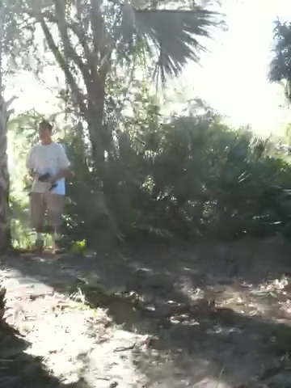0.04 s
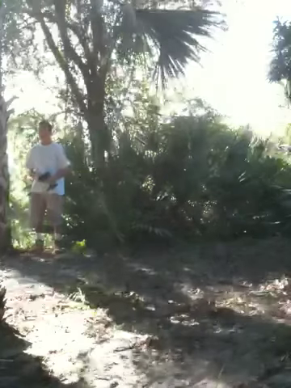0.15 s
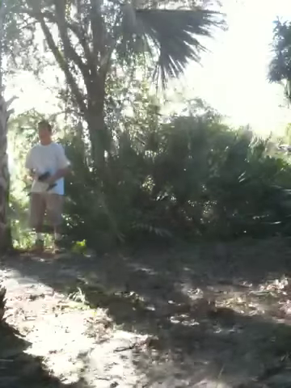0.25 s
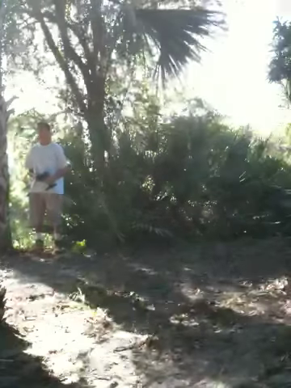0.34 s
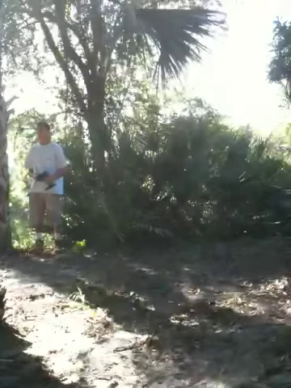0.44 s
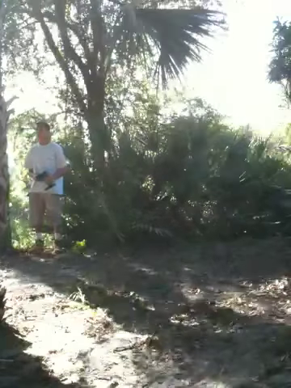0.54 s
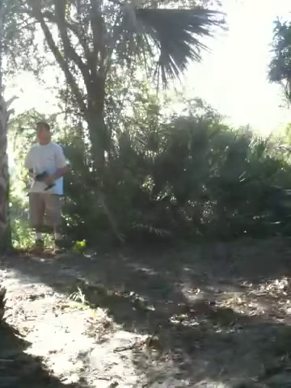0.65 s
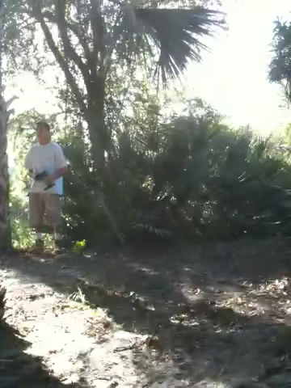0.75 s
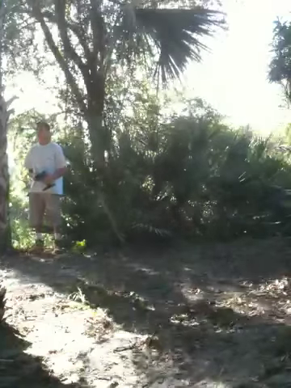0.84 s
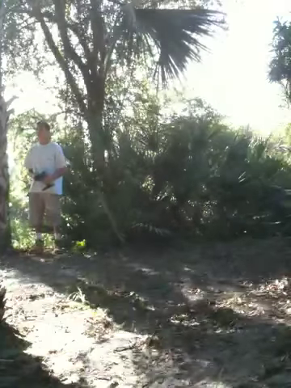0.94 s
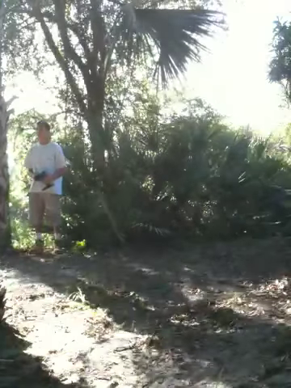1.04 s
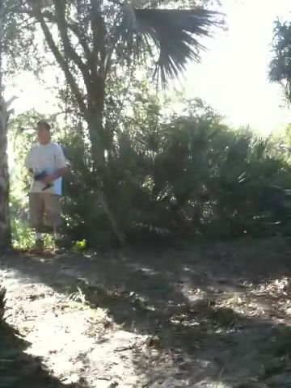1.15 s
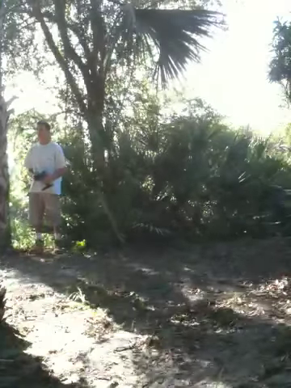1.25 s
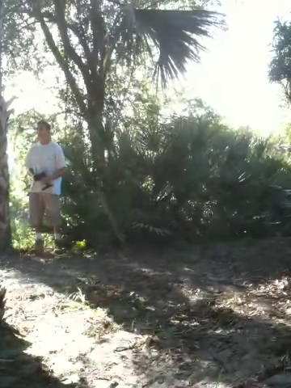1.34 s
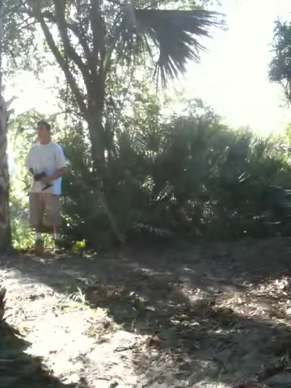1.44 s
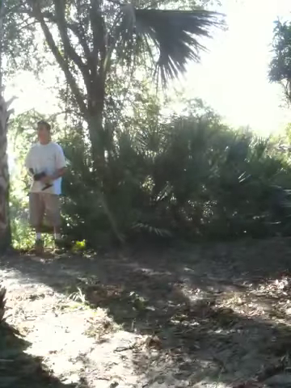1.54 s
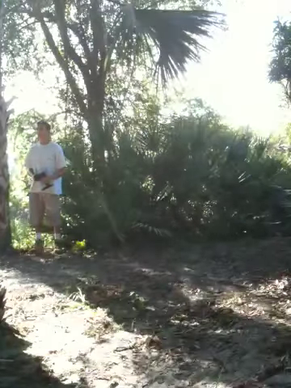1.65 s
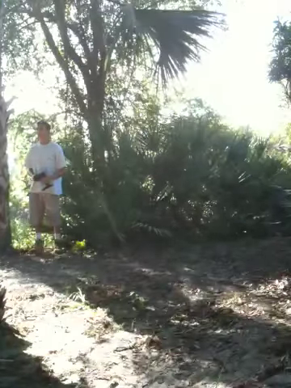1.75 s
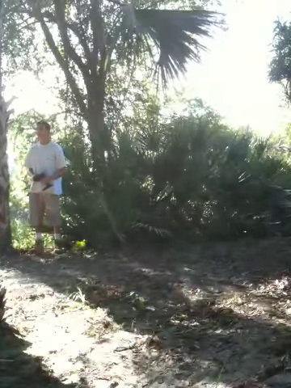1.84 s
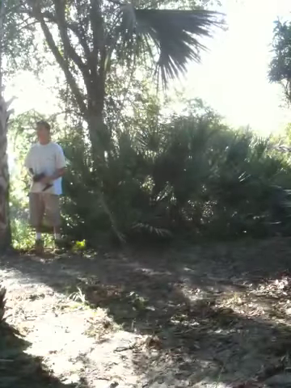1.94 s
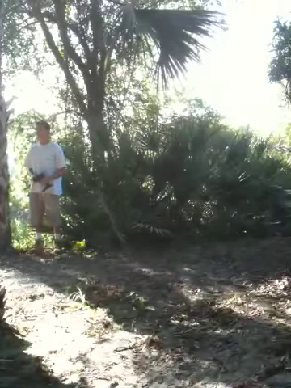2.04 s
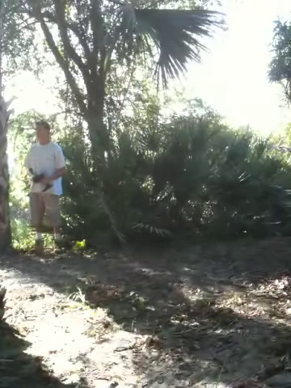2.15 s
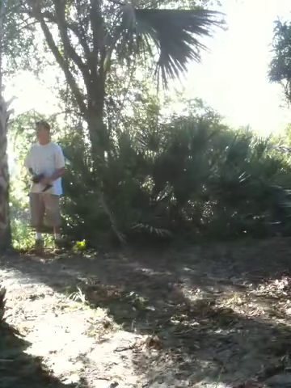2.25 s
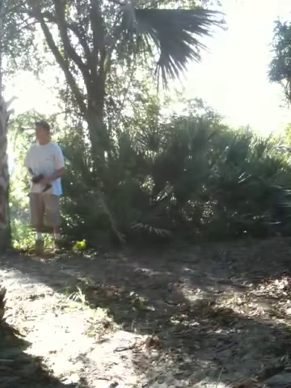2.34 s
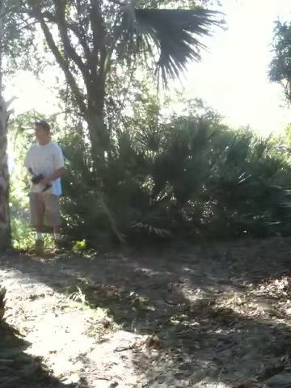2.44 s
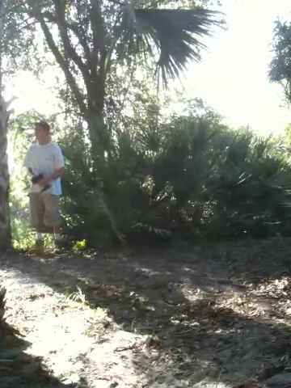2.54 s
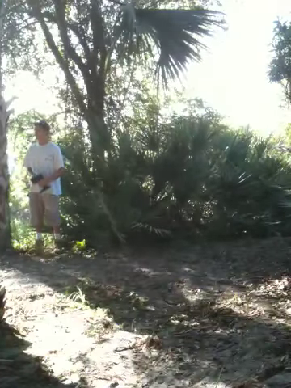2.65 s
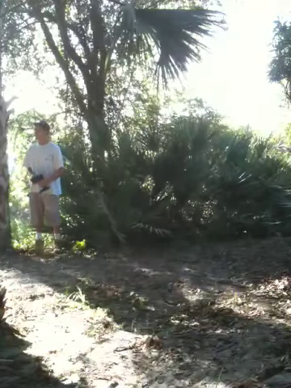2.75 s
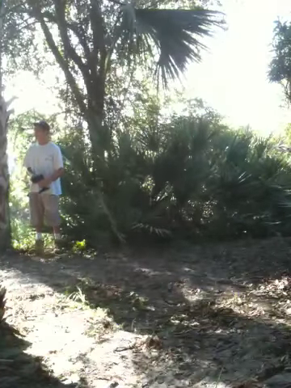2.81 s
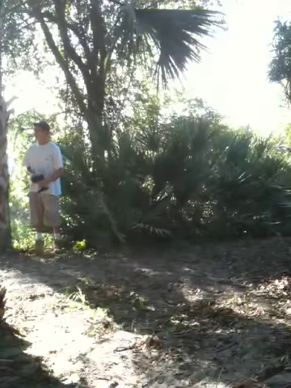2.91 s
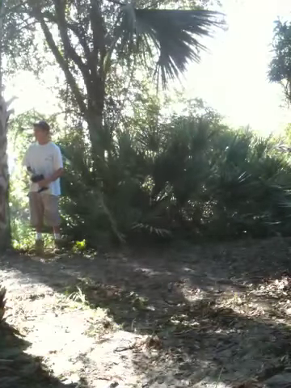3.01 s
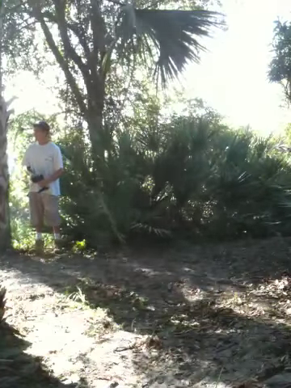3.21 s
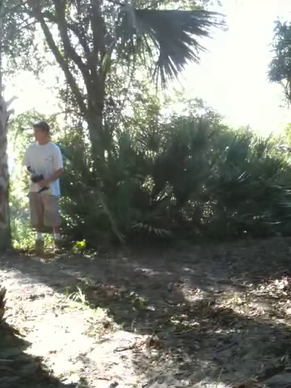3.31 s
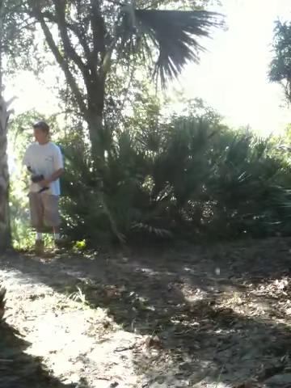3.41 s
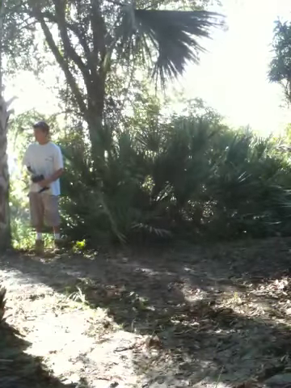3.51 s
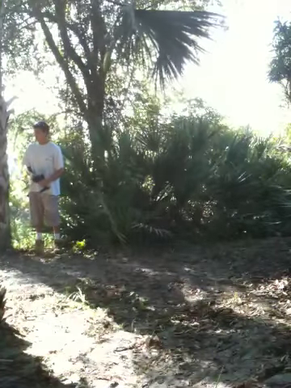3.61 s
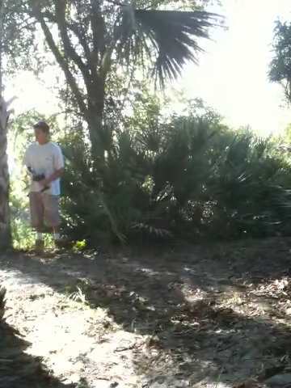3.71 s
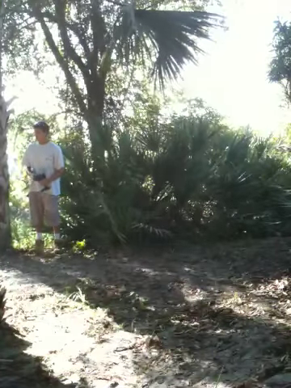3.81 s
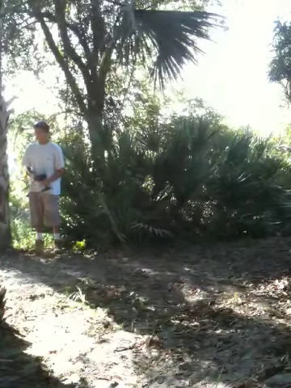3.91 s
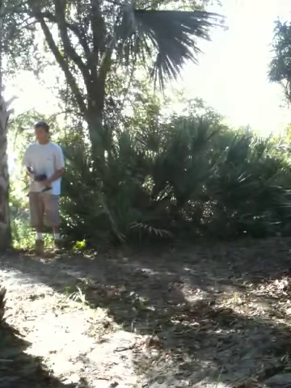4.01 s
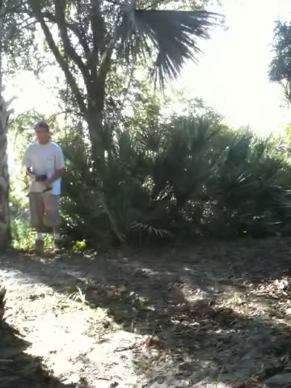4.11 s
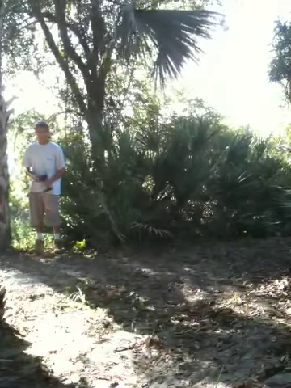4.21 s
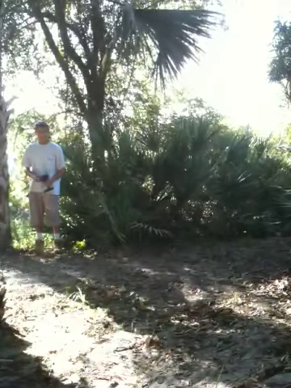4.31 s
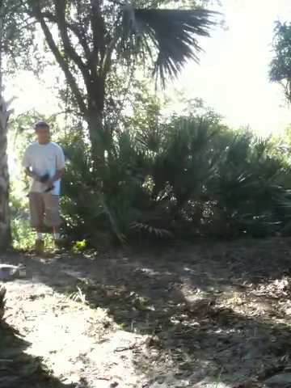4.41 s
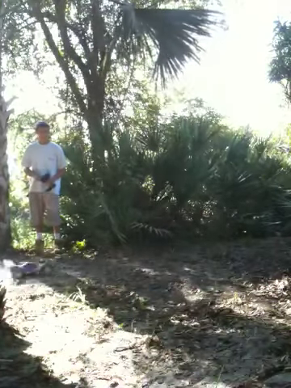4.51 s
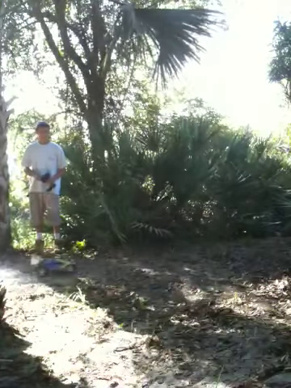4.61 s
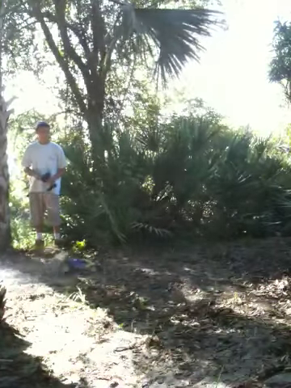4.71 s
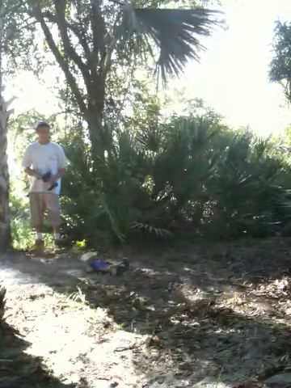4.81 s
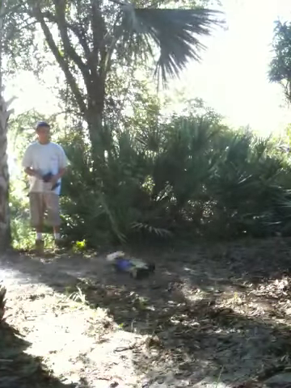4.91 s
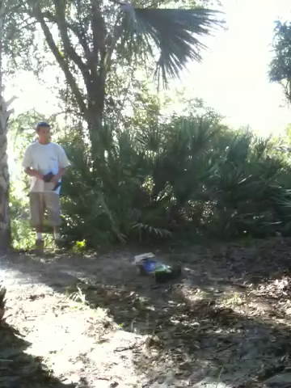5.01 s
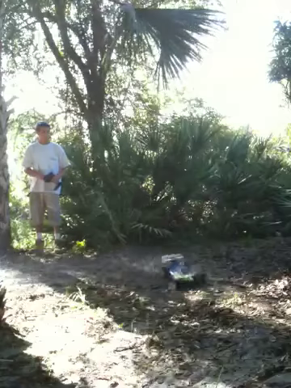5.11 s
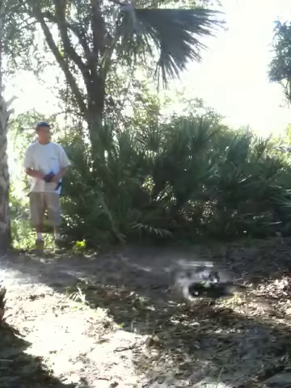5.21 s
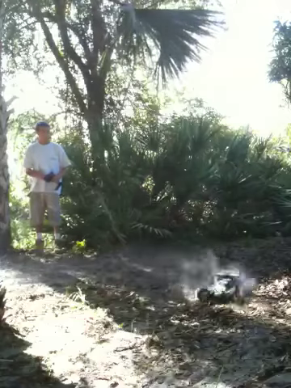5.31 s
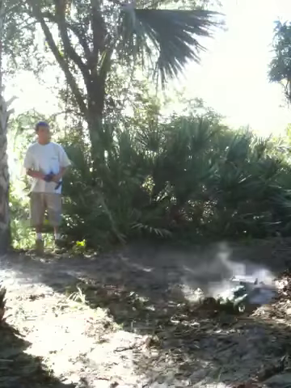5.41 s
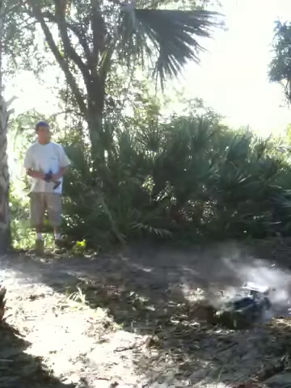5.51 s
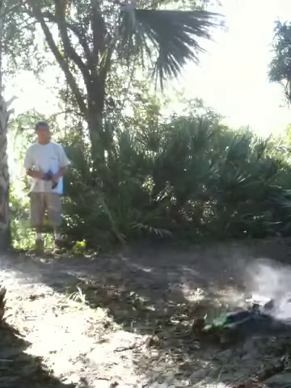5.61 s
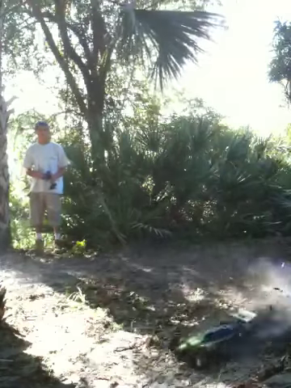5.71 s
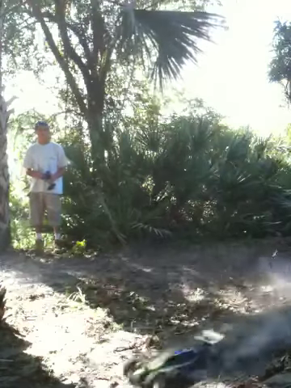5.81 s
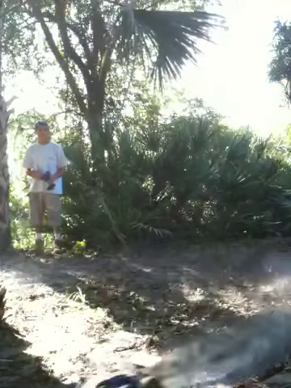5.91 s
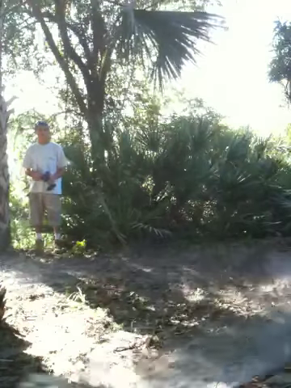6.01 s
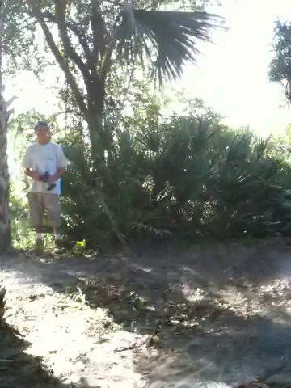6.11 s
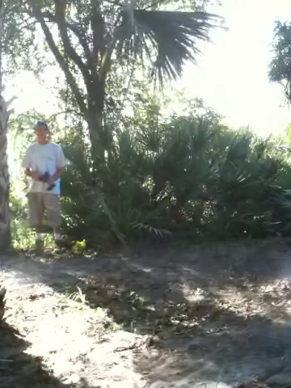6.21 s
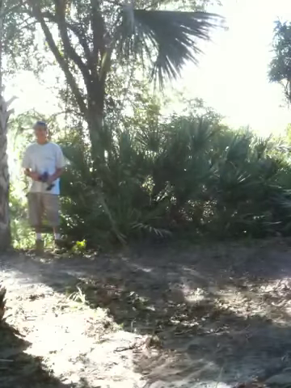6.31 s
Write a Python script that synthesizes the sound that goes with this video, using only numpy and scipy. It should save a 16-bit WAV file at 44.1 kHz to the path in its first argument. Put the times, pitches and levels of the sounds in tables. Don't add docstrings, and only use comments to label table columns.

```python
import sys
import numpy as np
from scipy import signal
from scipy.fft import rfft, irfft, next_fast_len
from scipy.io import wavfile
from scipy.ndimage import uniform_filter1d, map_coordinates

SR = 44100
rng = np.random.default_rng(int(sys.argv[2]) if len(sys.argv) > 2 else 0)


def master_out(mix):
    frames = np.transpose(np.atleast_2d(mix))
    ceiling = np.clip(frames, -1, 1)
    pcm = np.round(ceiling * 32767).astype(np.int16)
    wavfile.write(sys.argv[1], SR, pcm)


def invert_db(x):
    u = np.asarray(x, float) / 20
    return 10 ** u


N = 280035
SPLIT_HZ = 1380

# (centre [Hz], width [Hz], lift [dB])
SILENCER = [(1732, 154, 19.5), (2330, 1300, 6), (3820, 460, 9.5)]


def in_time(rows):
    s, *columns = np.transpose(rows)
    return [np.interp(np.arange(N) / SR, s, c) for c in columns]


def at_log(points, x):
    xs, values = np.transpose(points)
    return np.interp(np.log(x), np.log(xs), values)


def lift(modes, hz):
    power = 1
    for centre_hz, width_hz, peak_db in modes:
        power = power + (invert_db(peak_db) ** 2 - 1) / (1 + (2 * (hz - centre_hz) / width_hz) ** 2) ** 2
    return np.sqrt(np.maximum(power, 1e-3))


def drift(rate):
    r = np.exp(-16 * np.pi * rate / SR)
    slow = signal.lfilter([1], [1, -2 * r, r * r], rng.standard_normal(N // 8 + 4002))[4000:]
    return np.interp(np.arange(N) / 8, np.arange(len(slow)), slow / slow.std())


def even(x, span_s):
    return x / np.sqrt(uniform_filter1d(x ** 2, int(span_s * SR)) + 1e-12)


def coloured(spectrum, modes, shift, patchy_db):
    size = next_fast_len(N + N // 4)
    hz = np.arange(1, size // 2 + 2) * SR / size
    shaped = rfft(rng.standard_normal(size)) * invert_db(at_log(spectrum, hz)) * lift(modes, hz)
    place = np.cumsum(shift)
    lowest, highest = int(spectrum[0][0] / 1000), int(spectrum[-1][0] / 1000)
    out = np.zeros(N)
    for centre_khz in range(lowest, highest + 1):
        band = irfft(shaped * np.clip(1 - np.abs(hz / 1000 - centre_khz), 0, 1), size)
        out += map_coordinates(band, [place], order=3) * invert_db(patchy_db * drift(8.4))
    return out / out.std()


def throttle(lead_s, up_s, down_s):
    # (opens [s], held [s], rate gained [Hz], effort [dB], thump of the
    # first order [dB])
    blips = [(0.099, 0.16, 138, 10.5, 0.8), (0.494, 0.13, 135, 10.5, -5), (0.751, .132, 65, 6, -9),
             (1.031, .055, 114, 10.5, -12), (1.486, 0.15, 79, 10.5, 9), (2.03, 0.026, 69.5, 3, -15),
             (3.196, 0.013, 84.5, 6, -56), (3.328, 0.22, -56, -16, 12), (3.617, .121, 46.5, 4.5, -6),
             (4.388, 0.14, 51, 3, -4.5), (4.921, 0.093, 96, 5, 0), (5.243, .795, 68, 1, 1),
             (5.878, 0.0042, 112.5, -3, -3)]
    t = np.arange(0, N + 64, 64) / SR
    shapes = []
    for opens, held, *_ in blips:
        rise = 1 + np.tanh((t - opens + lead_s) / up_s)
        fall = 1 - np.tanh((t - opens - held - lead_s) / down_s)
        shapes.append(rise * fall / 4)
    gains = np.transpose(blips)[2:]
    return [np.interp(np.arange(N) / SR, t, gain @ shapes) for gain in gains]


def first_order(turn, firing_hz, level_db):
    # (rate [Hz], level [dB])
    ground_db = [(175, -15.5), (205, -16), (235, -11.5), (265, -17), (295, -16.5), (330, -4.5),
                 (355, -10.5)]
    level_db = level_db + at_log(ground_db, firing_hz)
    return np.sqrt(2) * invert_db(level_db + 1.15 * drift(58)) * np.sin(turn)


def firing_orders(turn, firing_hz, shift, tilt_db, high_tilt_db):
    # (order [multiple of the firing rate], level [dB])
    pulse_shape = [(2, 18.5), (3, 16.5), (4, 10.5), (5, 11), (6, 7), (7, 7.5), (9, 4), (12, 1), (17, 2.5)]
    low, ring = np.zeros(N), np.zeros(N)
    for k in range(2, 19):
        hz = k * firing_hz
        unsteady_db = 2.0 * drift(6) + 1.2 * drift(40)
        gain = invert_db(at_log(pulse_shape, k) + unsteady_db) * lift(SILENCER, hz / shift)
        order = gain * np.sin(k * turn + .3 * drift(25) - .25 * k ** 2)
        above = np.clip((hz - SPLIT_HZ) / 100 + .5, 0, 1)
        low += (1 - above) * order * invert_db(tilt_db * np.log2(hz / 700))
        ring += above * order * invert_db(high_tilt_db * np.log2(hz / 1730))
    return low, ring


def burn_noise(turn, shift):
    # (frequency [Hz], level [dB per Hz])
    rumble = [(150, -6.5), (250, 2), (500, 2.5), (900, 1), (1350, 0.5), (2600, -2.5), (3200, -14),
              (4000, -7)]
    noise = coloured(rumble, SILENCER, shift, patchy_db=5.5) * (1 + 0.3 * np.cos(turn))
    low = signal.sosfilt(signal.butter(4, SPLIT_HZ, fs=SR, output="sos"), noise)
    ring = signal.sosfilt(signal.butter(4, SPLIT_HZ, "high", fs=SR, output="sos"), noise)
    return low, ring


def exhaust(turn, firing_hz, shift, tilt_db, low_noisy_db, ring_noisy_db, high_tilt_db):
    low, ring = firing_orders(turn, firing_hz, shift, tilt_db, high_tilt_db)
    noise_low, noise_ring = burn_noise(turn, shift)
    low = even(low, 0.053) + invert_db(low_noisy_db) * even(noise_low, 0.17)
    steady_db = 8 * np.clip((firing_hz - 230) / 70, 0, 1)
    ring = even(ring, 0.09) + invert_db(ring_noisy_db - steady_db) * even(noise_ring, 0.34)
    return even(low, 0.059), even(ring, 0.17)


def jet(turn, shift, burble, spectrum):
    # (centre [Hz], width [Hz], lift [dB])
    stinger = [(3980, 780, 4), (6820, 470, 9.5), (8200, 840, 3.5), (9830, 170, 5)]
    cycle = (turn / (2 * np.pi)).astype(int)
    strength = invert_db(1.0 * rng.standard_normal(N // 50))[cycle]
    puff = 1 + 0.12 * np.cos(turn - 1.2)
    hiss = coloured(spectrum, stinger, shift, patchy_db=1.5)
    return even(hiss * puff * strength, 0.17) * burble ** 0.82


def stumble(burble_db):
    build = np.cumsum(33 * invert_db(1.35 * drift(9.213))) / SR % 1
    swell = 1.5 * (uniform_filter1d(build, 200) - 1.0) + .5 * drift(30)
    return invert_db(np.clip(burble_db, 0, 4) * swell)


def yard(x):
    # (frequency [Hz], level [dB per Hz])
    leaves = [(120, -30), (250, -8), (800, 6.5), (3000, -2), (9000, -1), (15000, -52)]
    # (delay [s], level [dB])
    echoes = [
        (.0041, -17.5),
        (.023, -12.5),
        (.061, -26),
    ]
    out = x + invert_db(-35.5) * coloured(leaves, [], np.ones(N), patchy_db=1.0)
    for delay_s, echo_db in echoes:
        lag = int(delay_s * SR)
        out[lag:] += invert_db(echo_db) * x[:-lag]
    return out


def scene():
    # (time [s], firing rate [Hz], nearness [dB], outlet turned to the microphone [dB])
    cruise = [(0, 196.5, -28.5, 8), (.66, 207, -29, 12), (.9, 232, -26, 12), (1.37, 208.7, -31, 10.5),
              (1.75, 200.8, -32.5, 8.5), (1.97, 244, -27, 10), (2.48, 207.9, -29.5, 7.5),
              (2.73, 245, -33.5, 9.5), (3.1, 245.2, -26.5, 0.8), (3.87, 225.2, -35, 7),
              (4.27, 235.4, -29.5, 2), (4.55, 229.5, -33.5, 7.5), (4.85, 216.7, -27.5, 0.2),
              (5.12, 243.9, -22, -1), (5.47, 230, -27, 11), (5.71, 255.9, -23.5, 11),
              (5.98, 251.8, -22.5, 11.5), (6.19, 179.3, -30, 4.5)]
    # (time [s], richness [0-1])
    richness = [(0, 0.73), (1.45, 1.), (1.75, .45), (2.03, 0.69), (2.15, 0.66), (2.5, 0.63), (2.75, 0.17),
                (3.25, .6), (3.45, 0.01), (3.65, .5), (3.95, 0.1), (4.9, 0.31), (5.1, 0), (5.5, 0.04),
                (5.8, 0.41), (6.0, 0.84), (6.12, 0.38)]
    # (time [s], tilt [dB per octave], first order [dB])
    heading = [(0, 4.5, 3.2), (.9, 2, 3.2), (1.3, 5, -1.3), (1.88, -0.5, -1), (2.15, 1.5, -7),
               (2.65, -5, 4.5), (2.9, 9, 6.5), (3.2, 0, -10), (3.5, 8, -0.5), (3.85, 4.5, 7), (4.43, -3, 2),
               (4.65, 3, 7), (4.97, -12.5, 1.5), (5.25, -7, -0.5), (5.55, -10, -5.5), (5.87, -11, -3),
               (6.02, 9.5, -1), (6.35, 3.5, 6)]
    # (time [s], lasts [s], ring level [dB])
    ring_swells = [
        (0.798, 0.13, -1),
        (1.3, 0.18, 3),
        (2.15, 0.027, 3.5),
        (3.601, 0.045, 1),
        (4.381, 0.029, 4),
        (4.966, 0.04, 2.5),
        (5.901, 0.08, 9.5),
    ]
    # (frequency [Hz], level [dB per Hz])
    jet_colour = [(3500, -50), (4500, -34), (5300, -30), (6200, -13), (7600, -12), (10000, -17),
                  (13000, -28), (16000, -36)]
    # (frequency [Hz], level [dB per Hz])
    rasp_colour = [(1900, -31), (2500, -4.5), (3200, -6), (4300, -1), (4900, -2), (5600, 5.5)]

    t = np.arange(N) / SR
    cruise_hz, near_db, facing_db = in_time(cruise)
    heading_tilt_db, heading_first_db = in_time(heading)
    rich, = in_time(richness)
    gone = (1 + np.tanh((t - 6.1) / 0.0583)) / 2

    gained_hz, _, _ = throttle(0, up_s=.043, down_s=.044)
    _, effort_db, thump_db = throttle(0.0074, up_s=0.037, down_s=0.037)
    firing_hz = cruise_hz + gained_hz
    pull = np.clip(uniform_filter1d(np.gradient(firing_hz), size=800) * SR / 1000, 0, 2)
    turn = 2 * np.pi * np.cumsum(firing_hz * (1 + .003 * drift(30))) / SR

    outlet_hz = 6920 - 619.6 * np.exp(-(firing_hz - 180) / 47.89)
    silencer_hz = .2525 * outlet_hz * (1 - 0.063 * gone + .025 * (.6 - rich))
    outlet_shift = outlet_hz / 6830
    silencer_shift = (silencer_hz / 1730) ** .9

    burble_full_db = 5
    burble_db = burble_full_db * rich * (260 - firing_hz) / 50
    burble = stumble(burble_db)

    first_db = near_db + 1.087 * facing_db + 0.76 * effort_db + thump_db + heading_first_db
    low_db = near_db + 0.54 * effort_db + 4 * pull
    jet_db = near_db + facing_db + effort_db
    rasp_db = -9.5 + 0.052 * effort_db - 1.5 * gone
    ring_db = near_db - 0.5 + 0.43 * facing_db + 0.94 * effort_db
    ring_db += 0.5 * np.cos(2 * np.pi * silencer_hz / firing_hz)
    for s, lasts, swell_db in ring_swells:
        ring_db += swell_db * np.exp(-((t - s) / lasts) ** 2)
    ring_db += 2 * np.clip(burble_db / burble_full_db, 0, 1)

    tilt_db = heading_tilt_db + .05 * np.maximum(firing_hz - 244, 0)
    high_tilt_db = -6 + .85 * facing_db - 9 * np.clip((205 - firing_hz) / 15, 0, 1)
    low_noisy_db = -10.5 + 9.5 * rich - .045 * (firing_hz - 205)
    ring_noisy_db = -5.5 + 4 * rich - 7 * gone
    ring_noisy_db += .05 * (1 - rich) * np.maximum(firing_hz - 250, 0)

    low, ring = exhaust(turn, firing_hz, silencer_shift, tilt_db, low_noisy_db, ring_noisy_db,
                        high_tilt_db)
    engine = first_order(turn, firing_hz, first_db)
    engine += invert_db(low_db) * low * burble ** 1.5 + invert_db(ring_db) * ring * burble
    engine += invert_db(jet_db) * jet(turn, outlet_shift, burble, jet_colour)
    engine += invert_db((ring_db + jet_db) / 2 + rasp_db) * jet(turn, outlet_shift, burble, rasp_colour)
    return np.tile(yard(engine), (2, 1))


def roll_off(x):
    return signal.sosfilt(signal.butter(12, 15660, fs=SR, output="sos"), x)


def record(dry):
    thin = signal.sosfilt(signal.butter(4, 160, "high", fs=SR, output="sos"), dry)
    top = np.where(thin > 0, .8, .76)
    squashed = thin / (1 + np.abs(thin / top) ** 8) ** (1 / 8)
    squashed = signal.sosfilt(signal.butter(1, 15, "high", fs=SR, output="sos"), squashed)
    notched = signal.lfilter(*signal.iirnotch(5150, 4.0, SR), squashed)
    mix = .45 * squashed + .55 * notched
    return roll_off(mix)


dry = scene()
out = record(dry)
master_out(out)
```